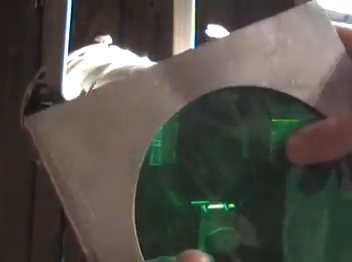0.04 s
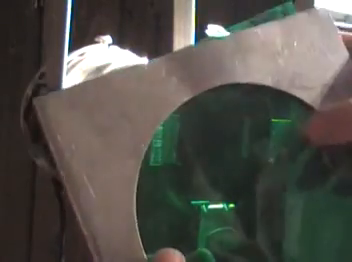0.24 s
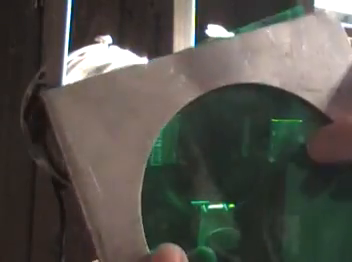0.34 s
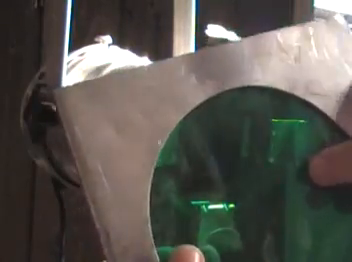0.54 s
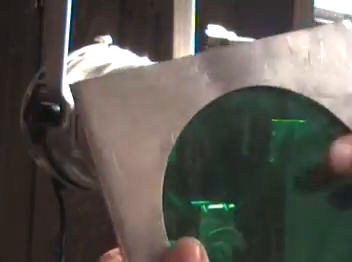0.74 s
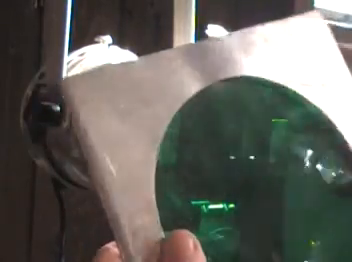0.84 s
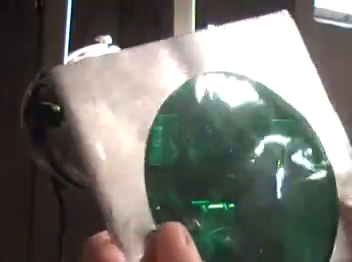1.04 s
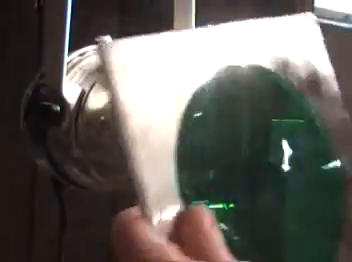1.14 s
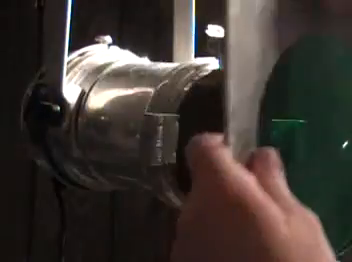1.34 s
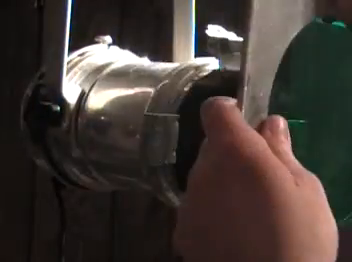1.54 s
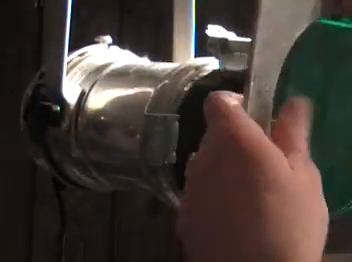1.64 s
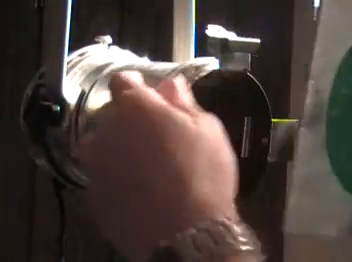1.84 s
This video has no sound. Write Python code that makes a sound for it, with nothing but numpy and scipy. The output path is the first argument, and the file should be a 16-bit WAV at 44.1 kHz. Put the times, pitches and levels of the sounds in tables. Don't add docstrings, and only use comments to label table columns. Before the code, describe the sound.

Thin plastic sheet crackles and hisses as hands work it in a sheet-metal frame, close to the microphone; two hard snaps follow, then a quieter gap and a few scuffs and knocks against a metal lamp.

```python
import sys
import numpy as np
from scipy import signal
from scipy.io import wavfile

SR = 44100
rng = np.random.default_rng(int(sys.argv[2]) if len(sys.argv) > 2 else 0)


def pcm_store(signal):
    levels = np.round(np.clip(np.atleast_2d(signal), -1, 1) * 32767)
    wavfile.write(sys.argv[1], SR, levels.astype(np.int16).T)


def nominal_scale(level):
    x = np.asarray(level, float) / 20
    return 10 ** x


N = 83790


def rms_one(x):
    return x / np.sqrt(np.mean(x ** 2) + 1e-20)


def at_hz(points, hz):
    point_hz, value = np.array(points).T
    return np.interp(np.log(hz), np.log(point_hz), value)


def drift(rate_hz):
    r = np.exp(-80 * np.pi * rate_hz / SR)
    noise = rng.standard_normal(N // 40 + 2002)
    slow = signal.lfilter([1], [1, -2 * r, r * r], noise)[2000:]
    return np.interp(np.arange(N) / 40, np.arange(len(slow)), rms_one(slow))


def bandpass(x, low_hz, high_hz):
    return signal.sosfilt(signal.butter(2, [low_hz, high_hz], "band", fs=SR, output="sos"), x)


def bands(sources, spectrum, patchy_db, rate):
    edges = 22 * 2 ** np.arange(0, 9.6, 0.5)
    together = drift(rate)
    for k, (low, high) in enumerate(zip(edges, edges[1:])):
        hz = np.sqrt(low * high)
        band = bandpass(sources[k % 2], low, high)
        flicker_db = patchy_db * (together + 1.28 * drift(rate))
        yield hz, band * nominal_scale(at_hz(spectrum, hz) + flicker_db)


def grains(shape, spread_db):
    size_db = spread_db * np.minimum(rng.exponential(1, shape), 5)
    return rms_one(nominal_scale(size_db) * rng.choice([-1, 1], shape))


# pitch in Hz, level in dB.
HUM_TONES = [(119.5, -56.5), (241, -62.5), (360, -78), (732, -69)]
HUM_WIDTH_HZ = 6.9


def hum():
    t = np.arange(N) / SR
    out = 0
    for hz, db in HUM_TONES:
        level = nominal_scale(db + 2.4 * drift(HUM_WIDTH_HZ))
        out = out + level * np.sin(2 * np.pi * hz * t + 0.77 * drift(HUM_WIDTH_HZ))
    return out * nominal_scale([[-1.5], [1.5]])


# pitch in Hz, level in dB per Hz.
AIR_COLOUR = [(25, -33.5), (100, -1.4), (250, -7), (700, -13.5), (1600, -25.5), (4000, -34.5),
              (7500, -32.5), (12500, -43.5)]
# pitch in Hz, likeness from 0 to 1.
AIR_LIKENESS = [(60, 0.35), (230, 0.07), (910, 0.029), (3550, 0.064), (13800, 0.01)]
# pitch in Hz, left minus right in dB.
AIR_BALANCE = [(60, -8.5), (370, -1), (2260, 0.5), (13800, -1.5)]
AIR_DB, AIR_TOP_HZ = -49.5, 11700


def air():
    out = 0
    for hz, (mid, side) in bands(rng.standard_normal((2, 2, N)), AIR_COLOUR, patchy_db=0.22, rate=4.3):
        alike = np.clip(at_hz(AIR_LIKENESS, hz), 0, 1)
        lean = at_hz(AIR_BALANCE, hz) / 2
        stereo = np.sqrt(1 + alike) * mid + np.sqrt(1 - alike) * side * [[1], [-1]]
        out = out + nominal_scale([[lean], [-lean]]) * stereo
    out = signal.sosfilt(signal.cheby2(8, 30, AIR_TOP_HZ + 600, fs=SR, output="sos"), out)
    return nominal_scale(AIR_DB) * rms_one(out)


# middle in seconds, half length in seconds, level in dB.
STROKES = [(0.002, 0.058, -46), (.07, 0.013, -45.5), (.175, 0.056, -41), (0.247, 0.014, -53),
           (0.363, 0.073, -49), (0.469, 0.024, -44), (0.52, 0.017, -45), (0.594, 0.035, -45.5),
           (0.681, 0.017, -40.5), (0.723, 0.025, -45.5), (0.83, 0.13, -60.5), (1.035, 0.027, -70),
           (1.236, 0.079, -65.5), (1.415, 0.04, -57.5), (1.491, 0.011, -55), (1.543, 0.035, -52.5),
           (1.595, 0.05, -51)]
# pitch in Hz, level in dB per Hz.
RUB_COLOUR = [(250, -3), (850, -1), (1800, -4), (3500, -6), (5500, -12.5), (7300, 3), (9600, -7.5),
              (13000, -30)]
RUB_GRAINS_PER_S, RUB_SPREAD_DB, RUB_PATCHY_DB = 20000, 3.4, 0.92


def rubbing():
    t = np.arange(N) / SR
    drive = grains((2, N), RUB_SPREAD_DB) * (rng.random((2, N)) < RUB_GRAINS_PER_S / SR)
    colour = [(20, -80)] + list(RUB_COLOUR)
    layer = rms_one(sum(band for _, band in bands(drive, colour, RUB_PATCHY_DB, rate=26)))
    return layer * sum(nominal_scale(db) * np.exp(-((t - s) / half_s) ** 2) for s, half_s, db in STROKES)


RUB_WIDE_DB, RUB_WIDE_HZ = -7.5, 6540


def wide_rubbing():
    hiss = signal.sosfilt(signal.butter(2, RUB_WIDE_HZ, "high", fs=SR, output="sos"), rubbing())
    return nominal_scale(RUB_WIDE_DB) * hiss * [[1], [-1]]


def ring(drive, hz, t60):
    r = nominal_scale(-60 / (t60 * SR))
    w = 2 * np.pi * hz / SR
    gain = np.sin(w) * np.sqrt(2 - 2 * r * r)
    return signal.lfilter([0, gain], [1, -2 * r * np.cos(w), r * r], drive + 1e-18)


# start in seconds, peak in dB, low share in dB, high share in dB,
# time to die by 60 dB in seconds.
SHEET_BUCKLES = [(0.018, -31.5, -8, 9, 0.0095), (0.089, -19.5, -4.5, -10, 0.04),
                 (0.097, -18.5, -17, -24.5, 0.074), (0.118, -27.5, -10, -11, 0.089),
                 (0.139, -26, -9, -7, 0.027), (0.166, -21.5, -12, -15, 0.022),
                 (0.237, -25, -11, -17, 0.034), (0.308, -19.5, -16, -21, 0.14),
                 (0.3216, -15, -9.5, -16, 0.044), (0.329, -25, -6.5, -20, 0.14),
                 (0.343, -33.5, -25, -2.5, 0.068), (0.374, -33.5, -0.5, -11, 0.12),
                 (0.397, -28.5, -4.5, -5, 0.072), (0.454, -27.5, -19, -8.5, 0.074),
                 (0.528, -31, -2, -46, 0.1), (0.576, -22, -6, -23, 0.064), (0.585, -22.5, -4, -4, 0.023),
                 (0.598, -29, -2.5, -31, 0.054), (0.679, -33, 7.5, -12, 0.039),
                 (0.725, -35.5, -3, 5.5, 0.024)]
# start in seconds, peak in dB, low share in dB,
# high share in dB, time to die by 60 dB in seconds.
FRAME_SNAPS = [(0.227, -23, -34, -6.5, 0.054), (0.297, -22.5, -7.5, -9.5, 0.025),
               (0.431, -36.5, 8.5, -17, 0.02), (0.485, -26.5, 2, -18, 0.066), (0.501, -24, -10, -8, 0.033),
               (0.515, -24, -5, -18, 0.11), (0.541, -20, 4, -32, 0.012), (0.64, -31, -7.5, -1, 0.051),
               (0.7742, -6.5, -14.5, -11.5, 0.046), (0.797, -33, -9, -10, 0.086),
               (0.8204, -2, -25.5, -12, 0.041), (0.9066, -20.5, -8.5, 3.5, 0.042),
               (0.931, -54, -13, 20.5, 0.034), (1.378, -33.5, -34, -11, 0.055),
               (1.398, -31.5, -8.5, -5, 0.06), (1.427, -28.5, -5, -9, 0.042), (1.512, -21, -10, -7, 0.032),
               (1.632, -12, -17, -12, 0.043), (1.834, -45, -14, 5, 0.012)]
# start in seconds, peak in dB,
# low share in dB, high share in dB, time to die by 60 dB in seconds.
FRAME_SHIFTS = [
    (1.213, -46, -9, -4, 0.041),
    (1.239, -45, -0.5, -7.5, 0.062),
    (1.279, -57.5, 5, 11.5, 0.026),
    (1.445, -36.5, -7, -8, 0.07),
    (1.552, -23, -10, -29, 0.023),
    (1.563, -15.5, -13, -24.5, 0.042),
    (1.574, -8.5, -17.5, -10, 0.052),
    (1.618, -25, -6.5, -16, 0.029),
    (1.653, -29.5, -8, -20, 0.034),
]
# pitch in Hz, level in dB.
SHEET_COLOUR = [(200, -19.5), (400, -12.5), (850, -4), (1500, -4), (3500, -4.5), (6500, -3), (9500, -3),
                (14500, -107)]
# pitch in Hz, level in dB, time to die by 60 dB in seconds.
FRAME_TONES = [(338, -3, 0.011), (850, -1.5, 0.058), (1110, -20, 0.022), (1495, -34.5, 0.12),
               (1980, -42, 0.074), (2580, -13, 0.073), (559.5, -1, 0.058), (6780, -22, 0.0036)]
SHARE_HZ = [820, 2640, 7000]
LOW_DB, MIDDLE_DB, HIGH_DB = -8, -20.5, -9
FIRST_CRACK_DB, SNAP_GRAIN_DB, GRAIN_SPREAD_DB = -12, -5.5, 1.63
START_DELAY_S = 0.001


def crackles():
    s, peak_db, low_db, high_db, t60 = np.transpose(FRAME_SNAPS + SHEET_BUCKLES + FRAME_SHIFTS)
    snaps = len(FRAME_SNAPS)
    t = np.arange(6000) / SR
    fade = nominal_scale(-60 * t / np.clip(t60, 0.003, 0.3)[:, None])
    burst = grains((2, len(s), len(t)), GRAIN_SPREAD_DB) * fade
    burst[:, :snaps] *= nominal_scale(SNAP_GRAIN_DB)
    burst[:, :snaps, 0] = nominal_scale(FIRST_CRACK_DB)
    where = ((s + START_DELAY_S) * SR).astype(int)[:, None] + np.arange(len(t))

    def drive(k, hz):
        share = [np.interp(np.log(hz), np.log(SHARE_HZ), [low + LOW_DB, MIDDLE_DB, high + HIGH_DB])
                 for low, high in zip(low_db, high_db)]
        gain = nominal_scale(peak_db + share + at_hz(SHEET_COLOUR, hz))
        hits = gain[:, None] * burst[k % 2]
        return np.bincount(where.ravel(), hits.ravel(), N + SR)[:N] + 1e-18

    out = np.zeros(N)
    for k, (hz, db, ring_s) in enumerate(FRAME_TONES):
        out += nominal_scale(db) * ring(drive(k, hz), hz, ring_s)
    edges = 180 * 2 ** np.arange(0, 6.6, 0.4)
    for k, (low, high) in enumerate(zip(edges, edges[1:])):
        band = bandpass(drive(k + 10, np.sqrt(low * high)), low, high)
        out += band * np.sqrt(SR / (high - low)) * (-1) ** k
    return out


# start in seconds, level in dB, body pitch in Hz, bright share in dB.
CREASE_POPS = [(.0193, -36, 2400, 11), (.0895, -32.5, 900, 8), (.0987, -24, 1800, -13),
               (.1672, -22, 1500, -9), (.2375, -30, 1690, -8), (.2967, -26.5, 900, -6),
               (.3101, -28, 1600, -9), (.3232, -27, 1300, 1), (.3265, -24, 1500, 2), (.3315, -41, 1200, -8),
               (.3381, -22, 1400, -8), (.3992, -41, 2500, 0), (.3998, -34, 12500, -20),
               (.4325, -32, 900, -15), (.4862, -31, 1200, -8), (.5022, -33, 1500, 9),
               (.5167, -20.5, 1400, -9), (.5300, -35, 1600, -10), (.5432, -26.5, 1100, -5),
               (.5790, -20, 1200, -14), (.5825, -30, 8500, -8), (.5870, -40, 2000, -8),
               (.5886, -26, 8500, -4), (.6805, -32, 1000, -4), (.7262, -39, 2500, 3),
               (.7270, -38, 9500, -10), (0.7756, -15.5, 1110, -4.5), (.7962, -40, 4500, 4),
               (.8207, -1.5, 1880, -3.5), (.9040, -41, 5000, 4), (.9065, -15.5, 4100, 4),
               (0.907, -20.5, 4100, 0.5), (1.3785, -42, 2500, -2), (1.3995, -37, 2500, 1),
               (1.4295, -36, 2000, 2), (1.5140, -31.5, 2000, 2.5), (1.5628, -30, 1050, -10),
               (1.6185, -36, 2500, -2), (1.5752, -36, 2500, 13), (1.5770, -22, 2000, 7.5),
               (1.6329, -23.5, 1200, 1)]
BODY_CYCLES, BRIGHT_HZ, BRIGHT_T60_S = 4.14, 6375, 0.003


def crease_pops():
    out = np.zeros(N + SR)
    age = np.arange(1000) / SR
    bright = nominal_scale(-60 * age / BRIGHT_T60_S) * np.sin(2 * np.pi * BRIGHT_HZ * age)
    for s, db, hz, bright_db in CREASE_POPS:
        body = nominal_scale(-60 * age * hz / BODY_CYCLES) * np.sin(2 * np.pi * hz * age)
        thin = signal.butter(2, 0.42 * hz, "high", fs=SR)
        pop = signal.lfilter(*thin, body + nominal_scale(bright_db) * bright)
        out[int(s * SR):][:len(age)] += nominal_scale(db) * pop
    return out[:N]


# start in seconds, pitch in Hz, level in dB, time to die by 60 dB in seconds.
FRAME_FLEXES = [
    (.088, 850, -26.5, 0.034),
    (0.325, 362, -34.5, 0.054),
    (.578, 334, -37, 0.11),
    (.776, 788, -21.5, 0.025),
    (.776, 544, -24.5, 0.028),
    (0.8241, 1110, -28.5, 0.034),
    (1.563, 1055, -31.5, 0.096),
    (1.633, 850, -31.5, 0.049),
    (1.632, 1380, -31, 0.022),
]


def flexes():
    t = np.arange(N) / SR
    out = 0
    for s, hz, db, t60 in FRAME_FLEXES:
        age = np.maximum(t - s, 0)
        swell = np.minimum(age * hz, 1)
        out = out + nominal_scale(db - 60 * age / t60) * np.sin(2 * np.pi * hz * age) * swell
    return out


ROOM_T60_S, ROOM_DB, WALL_CUT_HZ = 0.17, -13, 3700


def room(x):
    t = np.arange(SR // 3) / SR
    noise = rng.standard_normal((2, 2, len(t)))
    noise = noise + 1.4 * noise[:, :1]
    dull = signal.sosfilt(signal.butter(2, WALL_CUT_HZ, fs=SR, output="sos"), noise[0])
    tail = dull * nominal_scale(-60 * t / ROOM_T60_S) + 0.7 * noise[1] * nominal_scale(-60 * 2 * t / ROOM_T60_S)
    tail = tail * np.minimum(t / 0.0029, 1)
    return signal.fftconvolve(x[None], rms_one(tail) / np.sqrt(len(t)), axes=1)[:, :N]


# middle in seconds, pitch in Hz, level in dB.
BIRD_CHIRPS = [
    (1.02, 1895, -60.5),
    (1.324, 1920, -59.5),
    (1.491, 1920, -61),
    (1.492, 4760, -64),
    (1.753, 2920, -64),
    (1.786, 2870, -64),
    (1.885, 2890, -62),
]
CHIRP_S = 0.011


def bird():
    t = np.arange(N) / SR
    out = 0
    for s, hz, db in BIRD_CHIRPS:
        age = t - s
        swell = np.exp(-(2 * age / CHIRP_S) ** 4)
        out = out + nominal_scale(db) * swell * np.sin(2 * np.pi * hz * age * (1 - 0.42 * age))
    return out


PAN_DB, PORT_SIDE_DB, PORT_HZ = -1.1, -6, 7970


def scene():
    near = crackles() + crease_pops() + flexes() + rubbing()
    side = nominal_scale(PORT_SIDE_DB) * bandpass(np.gradient(near), PORT_HZ / 0.98, PORT_HZ * 1.2)
    front = near * nominal_scale([[PAN_DB / 2], [-PAN_DB / 2]]) + side * [[1], [-1]]
    return front + nominal_scale(ROOM_DB) * room(near) + wide_rubbing() + air() + hum() + bird()


def roll_off(x):
    return signal.sosfilt(signal.butter(12, 16400, fs=SR, output="sos"), x)


CUTOFF_HZ, MIC_TOP_HZ = 13860, 11100


def record(dry):
    cut = signal.sosfilt(signal.cheby2(8, 26, CUTOFF_HZ, fs=SR, output="sos"), dry)
    mix = signal.sosfilt(signal.butter(2, MIC_TOP_HZ, fs=SR, output="sos"), cut)
    return roll_off(mix)


dry = scene()
out = record(dry)
pcm_store(out)
```